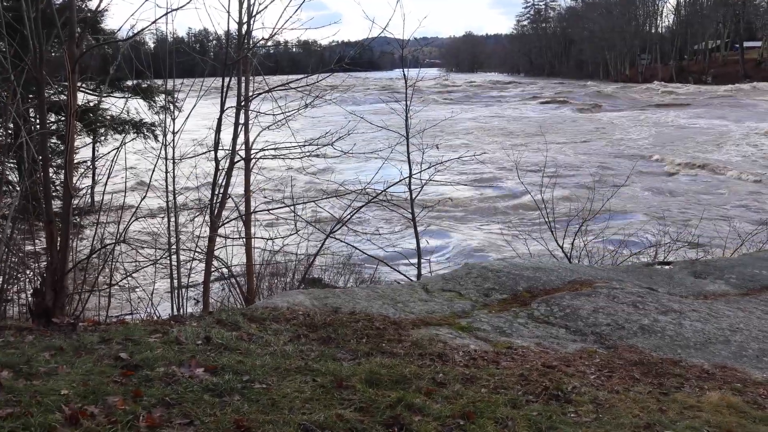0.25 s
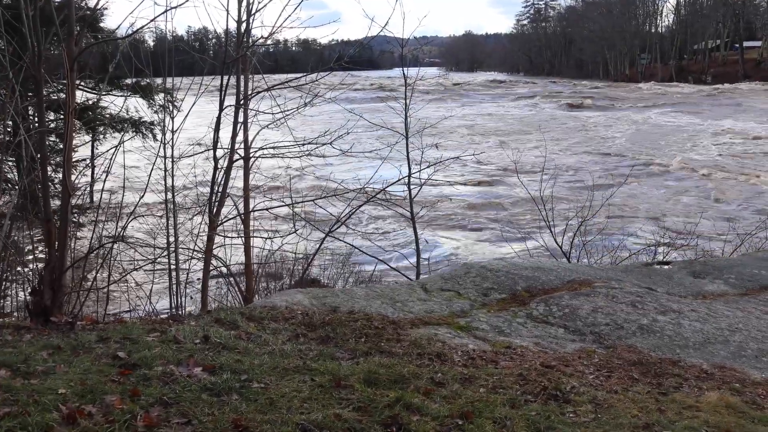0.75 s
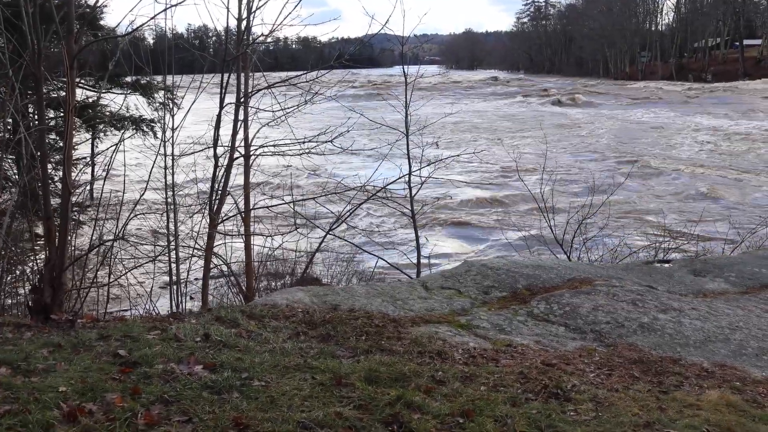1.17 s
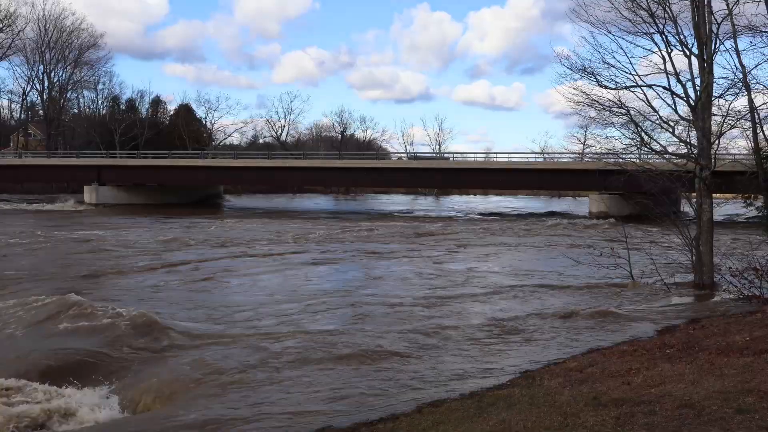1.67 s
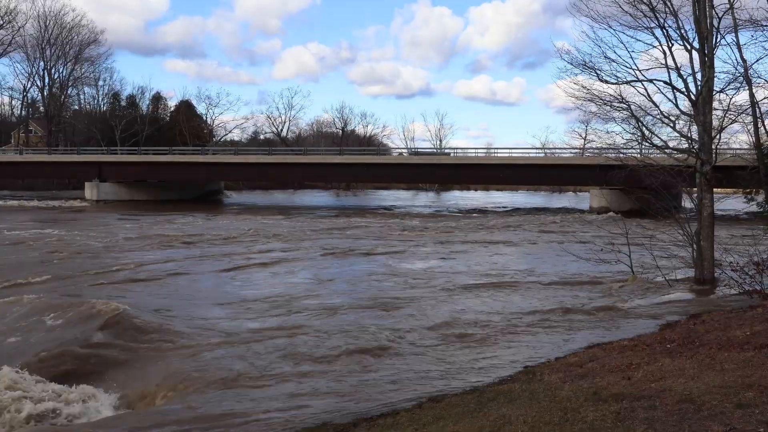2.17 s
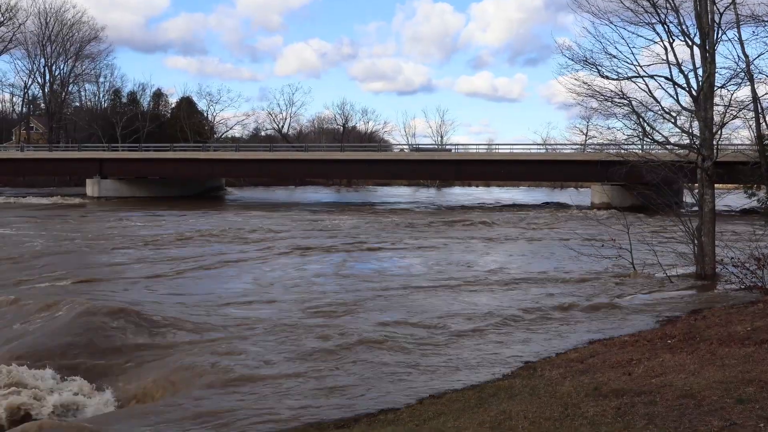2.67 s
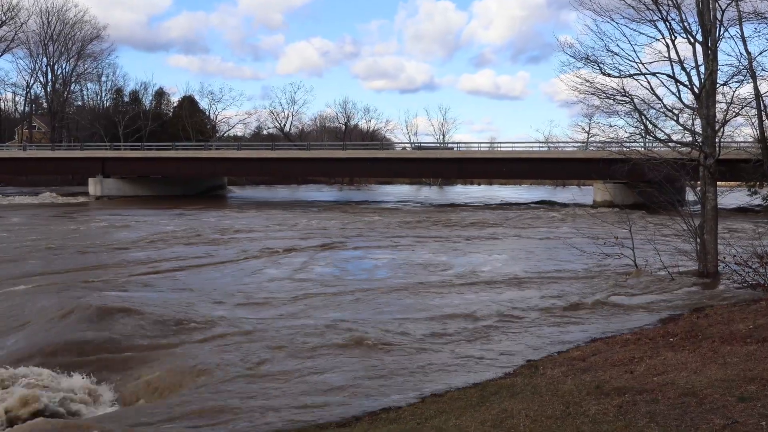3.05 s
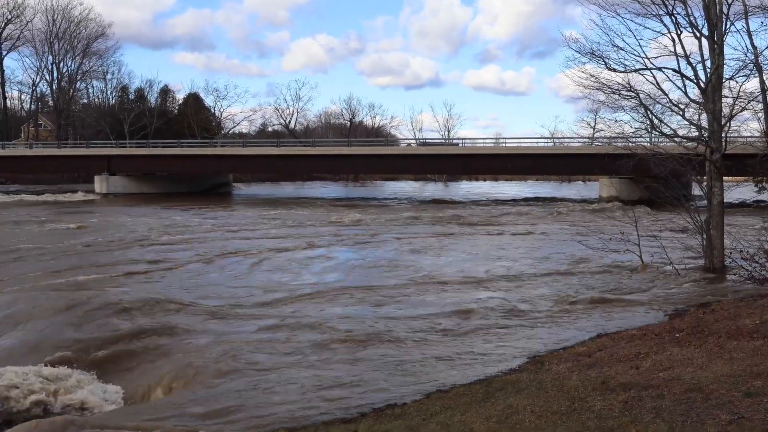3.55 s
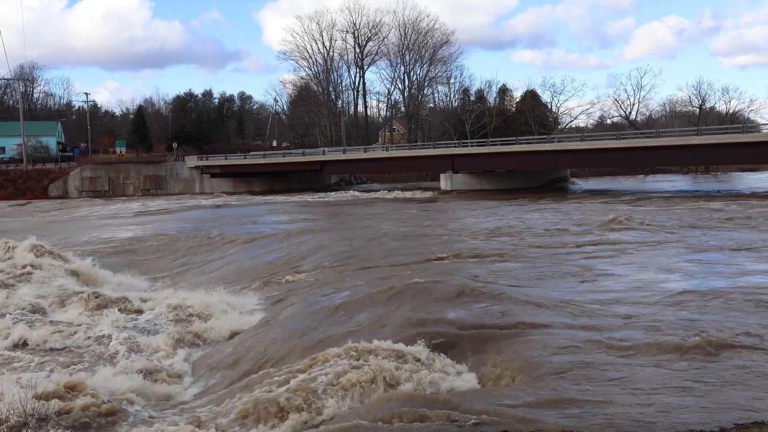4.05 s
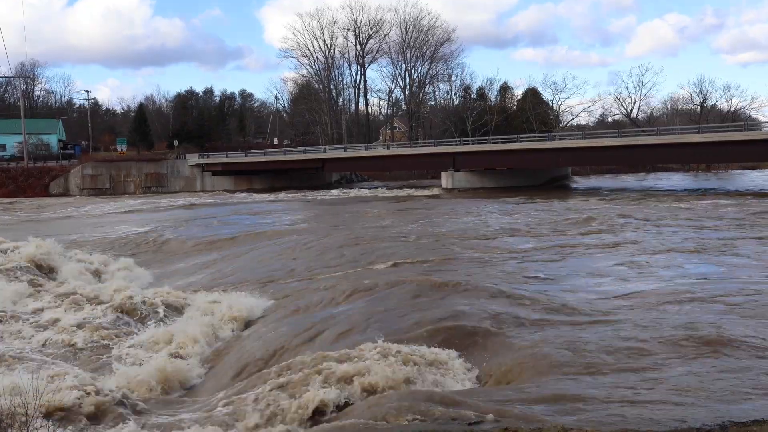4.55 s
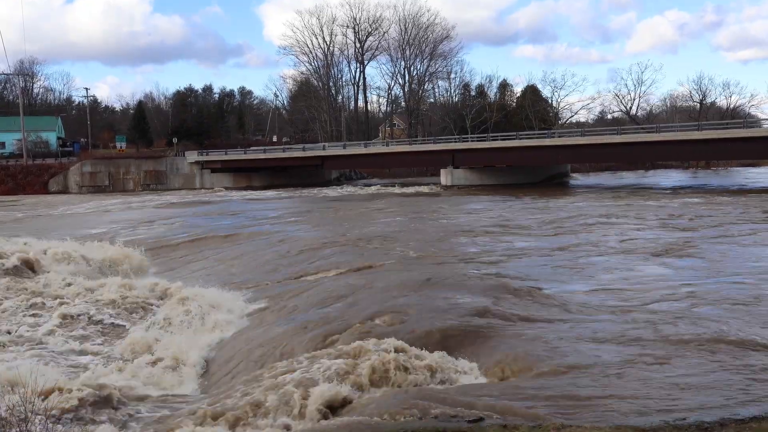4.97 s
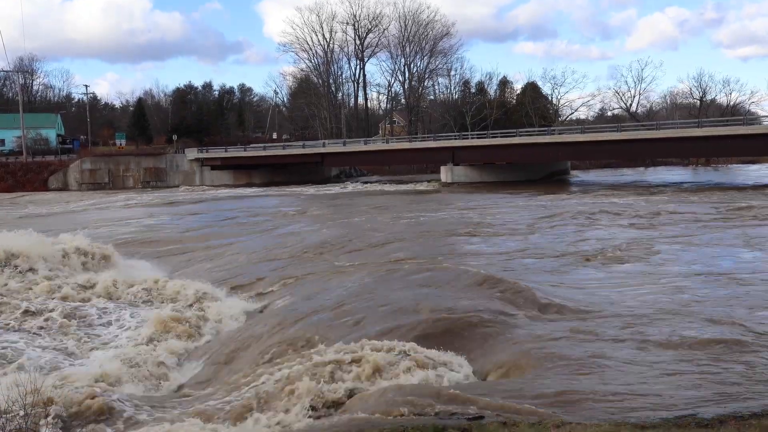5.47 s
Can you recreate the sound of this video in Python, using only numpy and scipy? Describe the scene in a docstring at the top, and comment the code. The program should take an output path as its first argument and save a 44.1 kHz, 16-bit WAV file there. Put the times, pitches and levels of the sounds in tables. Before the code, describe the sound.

Three joined takes of a swollen river, heard in stereo from the bank. First, bright broadband rushing with quick low wind thuds; next, a steady sheltered roar with more low rumble and softer treble, slowly easing; last, foaming turbulent water with rough, fluttering gusts hitting the left side of the unprotected microphone. Hard cuts with very brief dips divide them.

```python
"""On a river bank: a river in flood is heard from three spots in turn, with short silences between.
Countless random bubble bursts blend into a roar that flickers in each band of pitch.
At the first and third spots, gusts shed eddies that thud on each microphone port separately.
A faint, dull smear of the last moment, as an audio coder leaves, runs into each of the two gaps.
"""
import sys
import numpy as np
from scipy import signal
from scipy.fft import rfft, irfft, next_fast_len
from scipy.io import wavfile

SR = 44100
rng = np.random.default_rng(int(sys.argv[2]) if len(sys.argv) > 2 else 0)


def pcm_store(signal):
    """Save signal as 16-bit PCM."""
    levels = np.round(np.clip(np.atleast_2d(signal), -1, 1) * 32767)
    wavfile.write(sys.argv[1], SR, levels.astype(np.int16).T)


N = 252252

# When each of the three spots is heard: start t/s, end t/s
SPOTS = [(0, 1.190), (1.248, 3.593), (3.625, 5.72)]
BOIL_HZ = 600   # below this pitch the water flickers a little more, and its rumble has its own level


def from_db(db):
    """Turn decibels into a plain multiplier."""
    return 10 ** (np.asarray(db) / 20)


def rms_one(x):
    """Scale a signal to an rms level of 1."""
    return x / np.sqrt(np.mean(x ** 2) + 1e-20)


def at_hz(table, hz):
    """Read the columns of a table between its rows, along a log-frequency axis."""
    at, *columns = np.transpose(table)
    return [np.interp(np.log(hz + 1), np.log(at), column) for column in columns]


def drift(n, rate):
    """Slow random wandering: noise at every 40th sample, smoothed by two equal low-passes, rms 1."""
    step, run_in = 40, 2000   # samples per point, points thrown away while the filter settles
    r = np.exp(-2 * np.pi * rate * step / SR)
    noise = rng.standard_normal(n // step + run_in + 2)
    slow = signal.lfilter([1], [1, -2 * r, r * r], noise)[run_in:]
    return np.interp(np.arange(n) / step, np.arange(len(slow)), rms_one(slow))


def froth(n, per_s, spread_db, patchy_db):
    """Bubble bursts of uneven size, in two unrelated swarms; each half octave flickers on its own."""
    boil_db = 0.5   # extra flicker below BOIL_HZ
    hz = np.fft.rfftfreq(n, 1 / SR)
    together = drift(n, 9.3)
    burst_db = spread_db * np.minimum(rng.exponential(1, (2, n)), 4)
    sizes = from_db(burst_db) * rng.standard_normal((2, n))
    # a random phase walk along the pitch axis gives each pitch its own delay
    scatter = np.exp(1j * np.cumsum(rng.uniform(0, .2, len(hz))))
    bursts = sizes * (rng.random((2, n)) < per_s / SR)
    swarm = rfft(bursts) * scatter
    half_octave = 2 * np.log2(np.maximum(hz, 25) / 25)   # counted up from 25 Hz
    out = 0
    for k in range(20):
        overlap = np.clip(1 - abs(half_octave - k), 0, 1)
        band = irfft(swarm * overlap, n)
        flicker_db = patchy_db + boil_db * (25 * 2 ** (k / 2) < BOIL_HZ)
        out = out + band * from_db(flicker_db * (0.84 * together + drift(n, 11.0)))
    return hz, rfft(out)


def river(colour, image, levels, follows, n, start):
    """Two swarms of bubbles: one reaches both ports, shifted in phase; the other has opposite signs."""
    size = next_fast_len(n)
    hz, (direct, diffuse) = froth(size, per_s=14000, spread_db=1.5, patchy_db=0.4)
    (colour_db,) = at_hz(colour, hz)
    balance_db, alike, lead = at_hz(image, hz)
    side = np.array([[1], [-1]])   # left, right
    mix = np.sqrt((1 + alike) / 2) * direct + side * np.sqrt((1 - alike) / 2) * diffuse
    phase = side * .5j * np.clip(lead, -np.pi, np.pi)
    ports = mix * np.exp(phase) * from_db(colour_db + side * balance_db / 2)

    # set the level by the power between 2.5 and 8 kHz
    middle = (hz > 2500) & (hz < 8000)
    share = np.sum(abs(ports[:, middle]) ** 2) / np.sum(abs(ports) ** 2)
    roar = rms_one(irfft(ports, size)) / np.sqrt(share)
    s, db = np.transpose(levels)
    level_db = np.interp(start + np.arange(n) / SR, s, db)

    # the deep part follows only a share of the level change
    rumble = irfft(rfft(roar) / (1 + (hz / BOIL_HZ) ** 2), size)
    lag_db = (follows - 1) * (level_db - level_db.mean())
    balanced = roar[:, :n] + rumble[:, :n] * (from_db(lag_db) - 1)
    return balanced * from_db(level_db)


def wind_db(t):
    """Wind level on each port: every gust rises, holds and falls; the breeze fills the lulls."""
    # The breeze between gusts: t/s, left level/dB, right level/dB
    breeze = [(0, -29.5, -32), (1.19, -28, -27.5), (3.8, -43, -41), (4.2, -33, -39), (4.55, -22.5, -32),
              (4.67, -27, -38), (4.8, -26, -34), (4.9, -27.5, -46), (5.6, -40, -37)]
    # Gusts: full strength from t/s, held/s, left level/dB, right level/dB
    gusts = [(0.045, 0.008, -26, -25), (0.105, 0.01, -18, -17.5), (0.17, 0.019, -22, -16),
             (0.225, 0.075, -19, -16), (0.35, 0.035, -23, -17.5), (0.452, 0.006, -24, -21),
             (0.495, 0.025, -19, -20), (0.6, 0.015, -21, -23), (0.637, 0.004, -22, -23),
             (0.662, 0.03, -23, -20), (0.895, 0.01, -26, -24), (0.94, 0.0085, -19, -17),
             (1.0, 0.01, -20, -26), (1.14, 0.056, -36, -19.5), (3.625, 0.055, -18, -15),
             (3.73, 0.029, -19, -16), (3.855, 0.01, -28, -36), (4.145, 0.008, -26, -36),
             (4.232, 0.033, -19, -26), (4.3, 0.035, -25, -34), (4.43, 0.01, -22, -33),
             (4.52, 0.045, -15.5, -25), (4.6, 0.036, -21, -30), (4.722, 0.028, -15, -23),
             (4.815, 0.013, -20, -36), (5.045, 0.0093, -18, -37), (5.235, 0.055, -23, -42),
             (5.335, 0.03, -15.5, -22.5), (5.385, 0.023, -16, -22), (5.43, 0.058, -21.5, -34),
             (5.49, 0.02, -18, -29), (5.52, 0.13, -18.5, -29), (5.7, 0.017, -27, -39)]
    rise_db_per_s, fall_db_per_s = 362, 335
    s, *breeze_db = np.transpose(breeze)
    power = from_db([2 * np.interp(t, s, db) for db in breeze_db])   # doubled dB gives power
    for peak_s, held_s, *db in gusts:
        before_db = rise_db_per_s * (peak_s - t)
        after_db = fall_db_per_s * (t - peak_s - held_s)
        loss_db = np.clip(np.maximum(before_db, after_db), 0, 60)
        power = power + from_db(2 * (np.array(db)[:, None] - loss_db))
    return 10 * np.log10(power)


def add_eddy(track, s, size, hz, cycles):
    """An eddy passing a port: a pressure swing a few cycles long under a bell shape, centred on s."""
    half = int(cycles * SR / hz)
    t = np.arange(-half, half) / SR
    i = int(s * SR) - half
    if 0 <= i < N - 2 * half:
        bell = np.exp(-(2.5 * t * hz / cycles) ** 2) * np.hanning(2 * half) ** .25
        track[i:i + 2 * half] += size * np.cos(2 * np.pi * hz * t + .6) * bell


def wind(count, spread_db, lumpy_db):
    """Eddies of random size and pitch follow the gusts in lumps, with the strongest ones added."""
    # Pitch of the small eddies over time: t/s, typical f/Hz, spread either way/octaves
    eddies = [(0, 323, 0.9), (1.19, 328, 1), (3.62, 162, 1.7), (3.765, 150, 1.6), (3.78, 350.1, 1.1),
              (4.3, 370, 0.83), (4.6, 520, 1.4), (5.2, 527, 1.4), (5.4, 565, 1.34)]
    # The strongest eddies: t/s, peak level before mixing and filtering/dB, f/Hz, port (0 left, 1 right)
    thuds = [(0.1108, -1.7, 390.0, 0), (0.182, -2.9, 270.0, 1), (0.2254, -5.3, 340.0, 1),
             (0.2519, -4.3, 460.0, 1), (0.3093, -2.3, 350.0, 0), (0.3493, -6.4, 350.0, 1),
             (0.3758, -5.7, 390.0, 1), (0.4914, -3.2, 390.0, 1), (0.5131, -3.5, 580.0, 1),
             (0.6137, -6.2, 350.0, 0), (0.6894, -5.1, 530.0, 1), (0.899, -1.1, 550.0, 1),
             (0.9385, -5.5, 470.0, 0), (0.9996, -5.4, 290.0, 0), (4.2499, -7.6, 460.0, 0),
             (4.4343, -3.2, 350.0, 0), (4.5468, -6.7, 380.0, 0), (4.5577, -3.7, 870.0, 0),
             (4.5798, -3.8, 600.0, 0), (4.6242, 0, 620.0, 0), (4.6918, -9.1, 410.0, 0),
             (4.7119, -6.2, 670.0, 0), (4.7234, -4.8, 600.0, 0), (4.7288, -5.3, 480, 0),
             (4.7326, -7.4, 750.0, 0), (4.7392, -4.0, 720.0, 0), (4.7477, -4.3, 580.0, 0),
             (4.756, -7.9, 670.0, 0), (4.7647, -7.9, 1020.0, 0), (4.7896, -7.6, 460.0, 0),
             (4.815, -5.4, 620.0, 0), (4.8304, -7.7, 490.0, 0), (5.3389, -2.3, 830.0, 0),
             (5.3472, -1.6, 690.0, 0), (5.3597, -2.2, 380.0, 0), (5.3777, -5.1, 420.0, 0),
             (5.3809, -8.3, 690, 1), (5.3926, -7.7, 690.0, 0), (5.4058, 0, 900.0, 0),
             (5.4295, -5.5, 870.0, 0), (5.4573, -8.9, 870.0, 0), (5.4756, -6.7, 460.0, 0),
             (5.5226, -10.1, 450, 1), (5.5243, -6.6, 640.0, 0), (5.5479, -9.7, 850.0, 0),
             (5.5656, -7.1, 620.0, 0), (5.617, -8.2, 580.0, 0), (5.7021, -5.7, 600.0, 0)]
    low_cut_hz, bypass_from_s, bypass_to_s = 141, 1.248, 3.771
    spill_db = -26.0                  # share of an eddy that reaches the other port
    shared_hz, shared_db = 150, -6    # extra share for big slow eddies below this pitch
    lull_s, lull_db = 0.004, 6        # width and depth of the dip in small eddies around a strong one

    out, t = np.zeros((2, N)), np.arange(N) / SR
    gust_db = wind_db(t[::100])
    for port in range(2):
        when, size, up, down = rng.random((count, 4)).T
        when = when * N / SR
        s, typical_hz, octaves = np.transpose(eddies)
        offset = np.interp(when, s, octaves) * (up - down)
        hz = np.interp(when, s, typical_hz) * 2 ** offset
        sizes = from_db(-spread_db * np.log(np.maximum(size, .02))) * rng.choice([-1, 1], count)
        sizes = sizes * (hz / np.mean(hz)) ** .5   # big slow eddies last longer and swing less
        for row in zip(when, sizes, hz):
            add_eddy(out[port], *row, cycles=1.3)
        lumpy = rms_one(out[port] * from_db(lumpy_db * drift(N, 20.0)))
        out[port] = lumpy * from_db(np.interp(t, t[::100], gust_db[port]))
    out[:, (t > SPOTS[0][1]) & (t < SPOTS[2][0])] = 0   # the bridge spot is sheltered

    # make all the dips first, so that they leave the strong eddies alone
    half = int(3.0 * lull_s * SR)
    dip = np.exp(-(np.arange(-half, half) / SR / lull_s) ** 2)
    for s, peak_db, hz, port in thuds:
        i = int(s * SR)
        out[port, i - half:i + half] *= from_db(-lull_db * dip)
    for s, peak_db, hz, port in thuds:
        add_eddy(out[port], s, from_db(peak_db) * rng.choice([-1, 1]), hz, cycles=1.8)

    out = out + from_db(spill_db) * out[::-1]   # the ports sit close enough to share some of each eddy
    low_pass = signal.butter(1, shared_hz, fs=SR, output="sos")
    shared = out + from_db(shared_db) * signal.sosfilt(low_pass, out[::-1])
    low_cut = signal.butter(3, low_cut_hz, "high", fs=SR, output="sos")
    filtered = signal.sosfilt(low_cut, shared)
    return np.where((t > bypass_from_s) & (t < bypass_to_s), out, filtered)


def coder_smear(ending):
    """A faint, dull smear of the last moment, as an audio coder leaves: a low-passed copy, fading."""
    level_db, held_s, t60_s, dull_hz = -29.5, 0.013, 0.015, 1720   # t60: time to fall by 60 dB
    low_pass = signal.butter(3, dull_hz, fs=SR, output="sos")
    dull = signal.sosfilt(low_pass, ending)
    falling_s = np.maximum(np.arange(ending.shape[1]) / SR - held_s, 0)
    return dull * from_db(level_db - 60 * falling_s / t60_s)


def scene():
    """River and wind sound between each spot's start and end; a coder smear runs into each gap."""
    # Colour of the river at each spot: f/Hz, relative level per Hz/dB
    rapids = [(35.0, -85.0), (60.0, -78.4), (100.0, -60.7), (280.0, -46.0), (450.0, -50.1), (720.0, -48.6),
              (1150.0, -48.9), (1800.0, -49.7), (2800.0, -54.7), (4300.0, -59.2), (6300.0, -64.8),
              (8500.0, -69.0), (11000.0, -73.4), (15500.0, -81.2)]
    bridge = [(35.0, -73.6), (60.0, -57.4), (100.0, -48.2), (280.0, -44.8), (450.0, -47.1), (720.0, -51.8),
              (1150.0, -51.9), (1800.0, -55.6), (2800.0, -62.7), (3900.0, -65.2), (5300.0, -64.2),
              (6600.0, -67.4), (8500.0, -71.9), (11000.0, -77.0), (15500.0, -84.3)]
    breakers = [(35.0, -86.0), (60.0, -78.0), (100.0, -61.7), (180.0, -53.0), (280.0, -49.8),
                (450.0, -48.6), (720.0, -49.9), (1050.0, -49.2), (1800.0, -53.8), (2300.0, -55.3),
                (2900.0, -59.0), (4300.0, -58.6), (6300.0, -65.9), (8500.0, -69.5), (11000.0, -75.4),
                (15500.0, -80.5)]
    # Stereo image as heard: f/Hz, left minus right/dB, left-right likeness (0-1), left leads/rad
    rapids_image = [(300, -1.2, 0.995, 0.0), (700, -1.2, 0.995, 0.0), (1300, -1.4, 0.987, -0.02),
                    (2000, -1.6, 0.972, -0.04), (2700, -1.4, 0.957, -0.07), (3700, -2.6, 0.889, -0.21),
                    (5000, -1.0, 0.684, -1.06), (6500, -2.0, 0.636, -1.63), (8200, -0.1, 0.608, -2.14),
                    (9800, -0.0, 0.77, -2.87), (11000, 0, 1, -3.14), (15000, 0, 1, -3.14)]
    bridge_image = [(40, 0, 0.997, 0), (150, 0, 0.9995, 0), (300, 0.7, 0.996, 0.01), (700, 2.5, 0.993, 0.0),
                    (1300, 2.2, 0.993, 0.0), (2000, 1.4, 0.98, 0.02), (2700, 2.8, 0.761, 0.54),
                    (3700, 2.2, 0.779, 0.73), (5000, 3.6, 0.805, 0.35), (6500, 3.6, 0.65, 0.6),
                    (8200, 0.1, 0.623, 1.75), (9800, 0.3, 0.617, 2.31), (11300, 0.2, 0.8, 2.95),
                    (12300, 0, 1, 3.14)]
    breakers_image = [(300, 0.3, 0.995, 0.0), (700, 0.3, 0.995, 0.0), (1300, 0.1, 0.997, -0.0),
                      (2000, 0.1, 0.986, 0.01), (2700, -0.6, 0.759, 0.22), (3700, 0.5, 0.834, 0.3),
                      (5000, 0.3, 0.975, 0.03), (6500, 1.6, 0.595, 0.83), (8200, 0.5, 0.614, 0.6),
                      (9800, 1.0, 0.482, 1.3), (11500, 0.6, 0.366, 1.83), (15000, 0.6, 0.353, 2.26)]
    # Level of the river as heard, one list a spot: t/s, rms level of 2.5-8 kHz before record()/dB
    # It sinks under strong gusts as gain control would make it.
    river_levels = [
        [(0.0, -22.5), (0.33, -23.5), (0.8, -21.5), (1.05, -22.5), (1.19, -23)],
        [(1.25, -25.5), (1.8, -27), (2.42, -28), (2.75, -28), (3.59, -28.5)],
        [(3.63, -28.5), (3.77, -28), (3.84, -23.5), (4.3, -24), (4.53, -25.5), (4.62, -29), (4.72, -29.5),
         (4.8, -30.5), (5.33, -28), (5.4, -32), (5.48, -35.5), (5.55, -32), (5.62, -32), (5.7, -31)],
    ]
    # Share of the level change that the deep rumble follows, one number a spot (0-1)
    rumble_follows = (0.95, 0.62, 0.82)

    out = np.zeros((2, N))
    gusts = wind(count=4500, spread_db=1.6, lumpy_db=2.2)
    colours = (rapids, bridge, breakers)
    images = (rapids_image, bridge_image, breakers_image)
    spots = zip(SPOTS, colours, images, river_levels, rumble_follows)
    for (start, end), colour, image, levels, follows in spots:
        i, j = int(start * SR), min(int(end * SR), N)
        out[:, i:j] = river(colour, image, levels, follows, j - i, start) + gusts[:, i:j]
        if j == N:
            break
        n = SR // 40   # a fortieth of a second
        out[:, j:j + n] = coder_smear(out[:, j - n:j])
    return out


def record(dry):
    """The highest peaks are rounded, two narrow bands are turned down, the top is cut."""
    # Narrow dips in the recorder's response: f/Hz, width/Hz, depth (0-1)
    notches = [(7500, 150, .5), (15030, 150, .8)]
    cutoff_hz = 15740
    out = dry / (1 + np.abs(dry / 1.15) ** 6) ** (1 / 6)
    for hz, width, depth in notches:
        band = signal.lfilter(*signal.iirpeak(hz, hz / width, fs=SR), out)
        out = out - depth * band
    top_cut = signal.ellip(14, .3, 85, cutoff_hz, fs=SR, output="sos")   # steep low-pass
    return signal.sosfilt(top_cut, out)


dry = scene()
out = record(dry)
pcm_store(out)
```